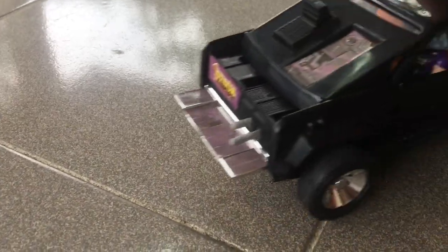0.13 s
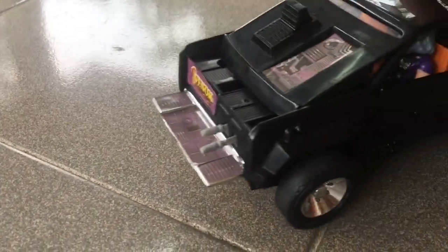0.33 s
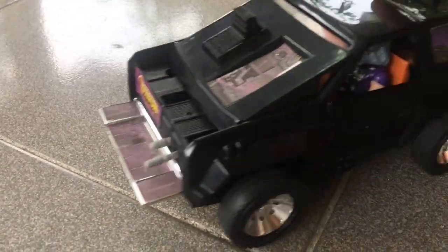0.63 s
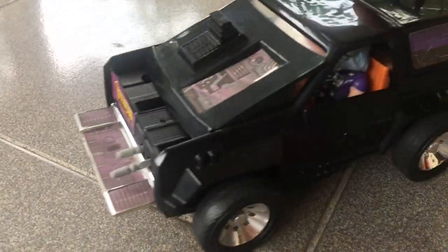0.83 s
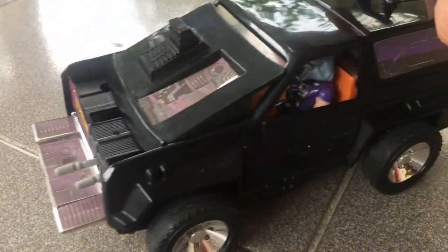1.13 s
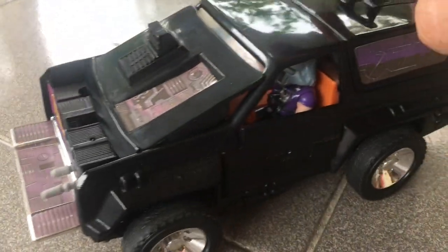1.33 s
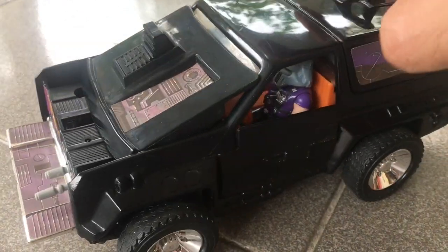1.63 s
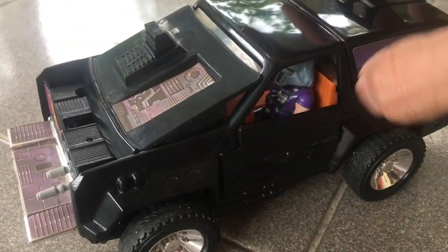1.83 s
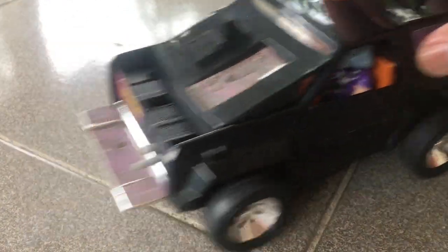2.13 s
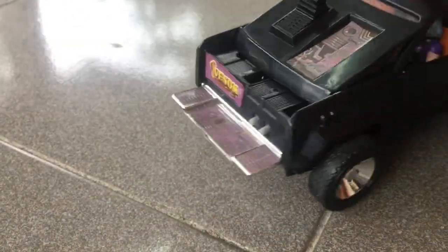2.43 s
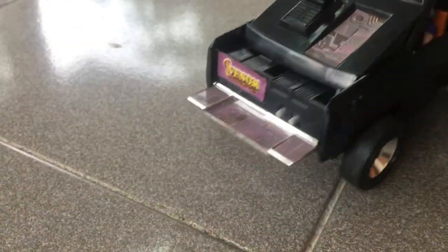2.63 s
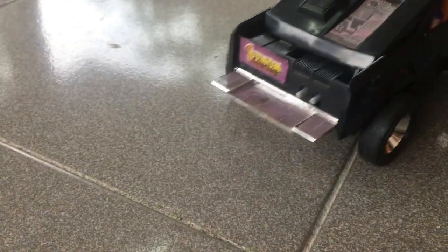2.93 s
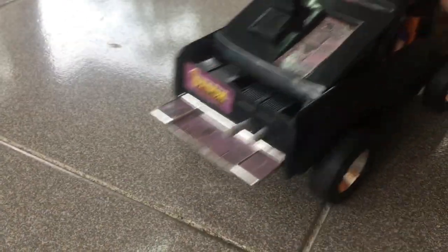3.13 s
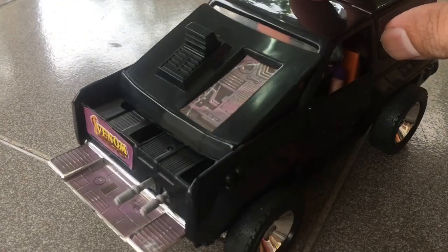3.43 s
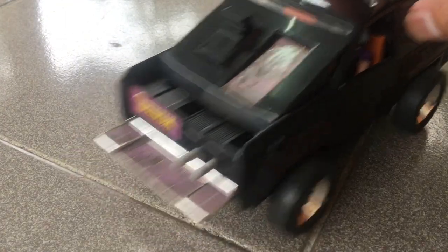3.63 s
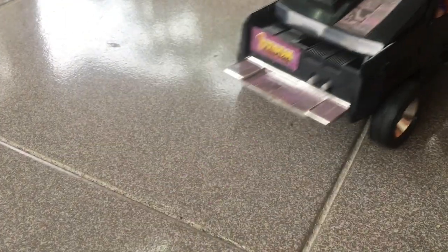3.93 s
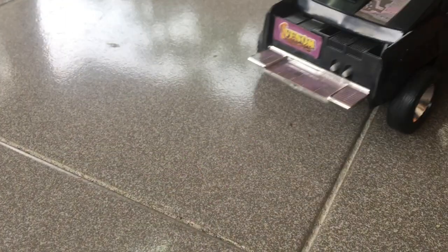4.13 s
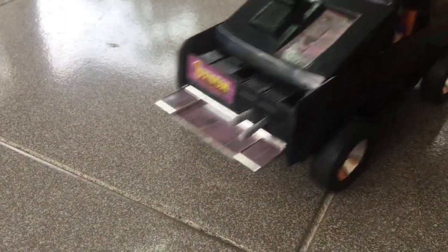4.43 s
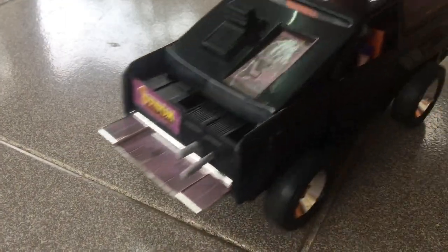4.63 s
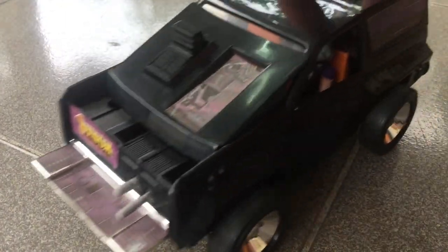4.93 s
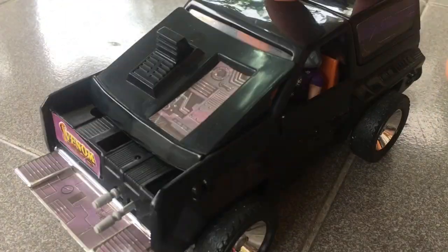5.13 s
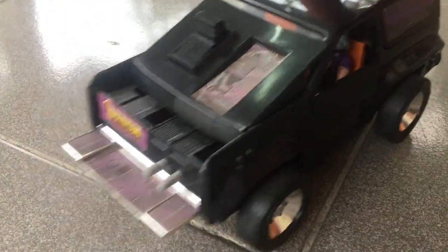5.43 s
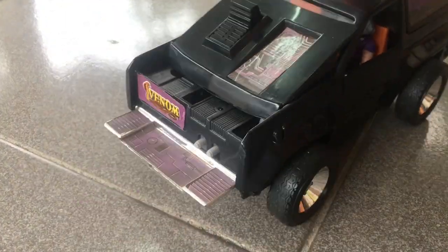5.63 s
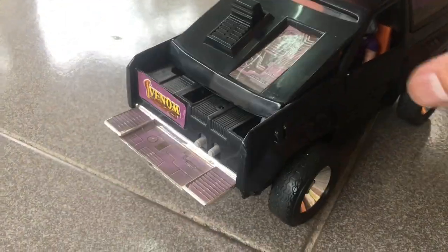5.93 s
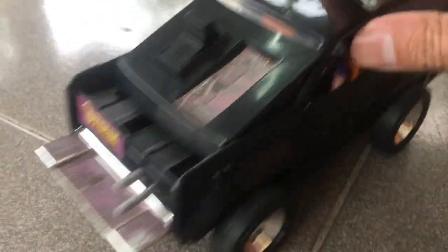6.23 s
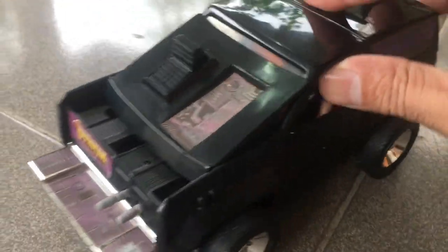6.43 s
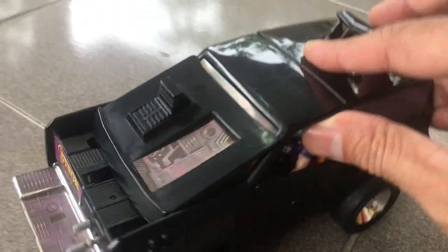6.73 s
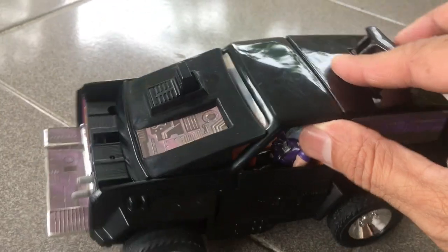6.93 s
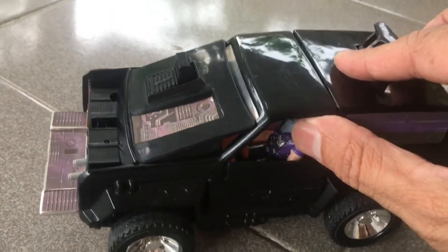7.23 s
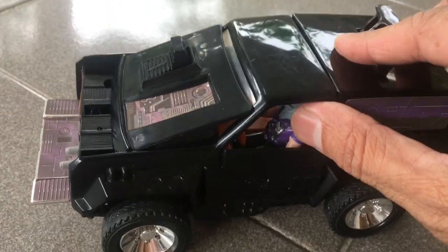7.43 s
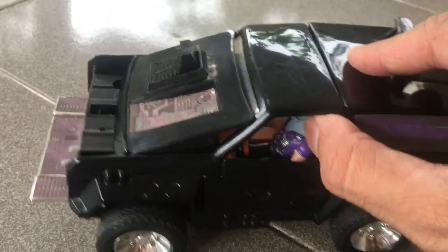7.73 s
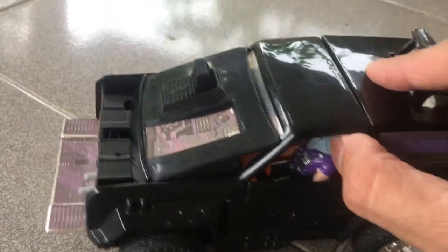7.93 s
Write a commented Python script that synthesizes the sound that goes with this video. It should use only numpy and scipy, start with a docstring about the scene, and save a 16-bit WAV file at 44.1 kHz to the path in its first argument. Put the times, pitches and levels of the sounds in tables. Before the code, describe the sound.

A hollow plastic toy truck is pushed over hard indoor tiles, very close to the microphone. From 0 to 1.4 seconds, crisp, bright clicks snap at uneven intervals of roughly 0.2 to 0.35 seconds. A deep soft rumble swells around 1.6 to 2.3. From 2.15 the clicks bunch into lighter ticks and loose rattles, with a tiny falling rubber squeak near 2.8. Strong snaps hit at 3.3 and 3.4, then small muffled clatter runs to 4.4. Four sharp clicks follow between 4.55 and 5.0, another group around 5.6, and single hard snaps at 6.45 and 6.8. Short rough rubber scuffs come at 6.9 to 7.3, with a faint one at 7.6; the rest is nearly still until about 8.1. Soft tread murmur, wavering low drone and steady dull room noise continue underneath, and clicks leave a short diffuse echo.

```python
"""Toy truck on tiles

A plastic toy truck is pushed back and forth on a tiled floor, close to the microphone.
Parts snap and rattle as rough forces ringing the modes of a hollow shell; the tread murmurs as shaped noise.
The rubber squeaks in falling chirps and scuffs by stick-slip pulses as the truck is turned.
Echoes and a diffuse tail answer, over a steady noise wash, a low wavering drone and an early deep rumble."""
import sys
import numpy as np
from scipy import signal
from scipy.fft import rfft, irfft
from scipy.io import wavfile
from scipy.ndimage import uniform_filter1d

SR = 44100
rng = np.random.default_rng(int(sys.argv[2]) if len(sys.argv) > 2 else 0)


def pcm_store(signal):
    """Save signal as 16-bit PCM."""
    levels = np.round(np.clip(np.atleast_2d(signal), -1, 1) * 32767)
    wavfile.write(sys.argv[1], SR, levels.astype(np.int16).T)


N = 356901
TIME = np.arange(N) / SR


def amp(db):
    """Decibels to gain."""
    return 10 ** (np.asarray(db) / 20)


def evened(x):
    """Scales to rms 1."""
    return x / np.sqrt(np.mean(x ** 2) + 1e-20)


def read(points, hz):
    """Reads a spectrum on a log-frequency axis."""
    f, value = np.transpose(points)
    return np.interp(np.log(hz + 1), np.log(f), value)


def curve(rows, at=TIME):
    """Reads a two-column control curve by straight lines."""
    x, y = np.transpose(rows)
    return np.interp(at, x, y)


def add(mix, s, sound):
    """Mixes a sound in at time s, trimmed to fit."""
    at = round(s * SR)
    sound = sound[max(-at, 0):]
    part = mix[max(at, 0):][:len(sound)]
    part += sound[:len(part)]


def cut(x, start_s, end_s):
    """The stretch of x between two times."""
    return x[round(start_s * SR):round(end_s * SR)]


def band(x, lo_hz, hi_hz, order=3):
    """Band-pass."""
    return signal.sosfilt(signal.butter(order, [lo_hz, hi_hz], "band", fs=SR, output="sos"), x)


def noise(colour):
    """Noise of a given spectrum, rms 1."""
    gain = amp(read(colour, np.fft.rfftfreq(N, 1 / SR)))
    return evened(irfft(rfft(rng.standard_normal(N)) * gain, N))


def wander(rate_hz):
    """Slow chance, rms 1."""
    hz = np.fft.rfftfreq(N, 1 / SR)
    return evened(irfft(rfft(rng.standard_normal(N)) * np.exp(-(hz / rate_hz) ** 2), N))


def ring(modes, size=1200):
    """Impulse response of each damped mode, one row a mode; no mode is narrower than 150 Hz."""
    hz, width_hz, db = np.transpose(modes)[:, :, None]
    width_hz = np.maximum(width_hz, 150)
    t = np.arange(size) / SR
    return amp(db) * width_hz * np.exp(-np.pi * width_hz * t) * np.cos(2 * np.pi * hz * t)


def catches(size, spread_db):
    """Tiny catches of two surfaces: mostly small, a few large."""
    return rng.standard_normal(size) * amp(spread_db * np.clip(rng.standard_normal(size), -2, 2))


def hum(hz, db, waver_db, drift_hz):
    """A low tone whose pitch drifts and whose level wavers."""
    phase = 2 * np.pi * np.cumsum(hz + drift_hz * wander(4.04)) / SR
    return amp(db + waver_db * wander(17.0)) * np.sqrt(2) * np.sin(phase)


def background(swell_db=.5, throb_db=-45):
    """A steady wash with faint hums, a low drone, and a throbbing narrow band of rumble."""
    # Spectrum of the wash. Each row: frequency in Hz, relative density in dB per Hz.
    wash_colour = [(15, -15), (26, 6), (36, -14.5), (55, -0.5), (100, 0), (150, 1), (250, -3.5), (400, -10),
                   (650, -12.5), (1000, -21), (2000, -28.5), (4000, -37), (8000, -44), (16000, -48.5)]
    # Level of the wash, its hums included. Each row: time in seconds, level in dB.
    wash_level = [(0.0, -39), (1.5, -40), (2.3, -39), (5.5, -39), (6.5, -38.3), (8.09, -38.5)]
    # Faint hums around the drone. Each row: frequency in Hz, level over the wash in dB.
    hum_rows = [(25, -13), (130, -12.5), (147.5, -8.5)]
    # Pitch of the drone before drift. Each row: time in seconds, frequency in Hz.
    drone_pitch = [(0.0, 67.5), (0.6, 71), (1.5, 65.5), (1.75, 71.5), (3.1, 71.5), (3.4, 74.5), (4.2, 74),
                   (4.6, 76), (5.5, 76), (6.0, 75), (7.15, 76), (7.45, 70.5), (8.09, 71.5)]
    # Level of the drone before waver. Each row: time in seconds, level in dB.
    drone_level = [(0.0, -35.5), (0.5, -36.5), (0.6, -56), (1.0, -41.5), (1.8, -39.5), (2.6, -37),
                   (2.75, -30), (2.85, -39.5), (3.55, -29.5), (3.7, -36.5), (4.05, -36), (4.41, -38.5),
                   (4.6, -27.5), (5.1, -39), (5.18, -50), (5.27, -30.5), (5.74, -37), (5.86, -49),
                   (5.99, -35.5), (6.37, -28.5), (6.52, -42), (6.85, -35.5), (7.37, -40.5), (7.65, -32.5),
                   (8.09, -48)]
    hums = sum(hum(hz, db, waver_db=2.5, drift_hz=2.5) for hz, db in hum_rows)
    wash_gain = amp(curve(wash_level) + swell_db * wander(7.4))
    wash = wash_gain * (noise(wash_colour) + hums)
    drone = hum(curve(drone_pitch), curve(drone_level), waver_db=1.5, drift_hz=.3)
    throb = amp(throb_db) * evened(band(rng.standard_normal(N), lo_hz=57.7, hi_hz=72, order=2))
    return wash + drone + throb


def rolling(tread_db=-1, flutter_db=1.46):
    """The tread murmurs over the tiles, and a deep rumble of handling or air swells early on."""
    # Tread on the tiles. Each row: time in seconds, level in dB before tread_db is added.
    tread_level = [(0.0, -45), (2.12, -44), (2.34, -41), (2.66, -43.5), (3.0, -42.5), (3.45, -46.5),
                   (4.48, -44.5), (4.71, -48), (5.7, -44.5), (6.9, -46.5), (8.09, -45)]
    # Spectrum of the tread. Each row: frequency in Hz, relative density in dB per Hz.
    tread_colour = [(300, -11), (750, -7), (1050, 0.5), (1350, -3), (1800, -12), (2600, -22.5), (5000, -66),
                    (15000, -50)]
    # Deep rumble. Each row: time in seconds, level in dB.
    rumble_level = [(1.5, -62), (1.65, -32.5), (1.85, -45), (2.05, -31.5), (2.32, -49), (3.3, -40),
                    (3.6, -56)]
    rumble_colour = [(15, -24), (28, -14), (48, -18), (62, -16.5), (100, -36), (400, -53), (2000, -100)]
    tread_gain = amp(tread_db + curve(tread_level) + flutter_db * wander(36))
    tread = tread_gain * noise(tread_colour)
    rumble = amp(curve(rumble_level)) * noise(rumble_colour)
    return tread + rumble


def shell(force, seconds, level_db, low_db, top_db, vary_db=3, direct=0.05):
    """A force rings the hollow shell, with a chance mix of modes and a given weight of body and edge."""
    # Resonances of the plastic. Each row: frequency in Hz, width in Hz before ring's floor, level in dB.
    shell_modes = [(1170, 180, 11), (1450, 130, 10.5), (1667, 230, 13.5), (1860, 360, 4), (2530, 220, 6),
                   (3010, 110, 3), (3520, 390, 4.5), (3840, 170, 2), (4535, 280, 4), (5130, 280, -9),
                   (5630, 380, -9), (6200, 330, -3), (6990, 420, 1.5), (7770, 920, -3), (8940, 1200, 2),
                   (10250, 830, 8.5), (11200, 310, -16), (12550, 220, -19), (16000, 310, -13)]
    # A blow with little body leaves the lowest modes at rest. Each row: low body in dB, lowest Hz.
    lowest = [(-15, 1570), (-7, 1200), (10, 730)]
    # Upper limits of the low body, the middle and the bright edge, in Hz.
    upper_hz = [2200, 6000, 17000]
    modes = ring(shell_modes)
    mix = amp(vary_db * rng.uniform(-1, 1, (len(modes), 1)))
    response = (mix * modes).sum(0)
    response[0] += direct * SR / np.pi
    sound = signal.fftconvolve(force, response)
    edges_hz = [curve(lowest, low_db), *upper_hz]
    out = 0
    for lo_hz, hi_hz, db in zip(edges_hz, edges_hz[1:], (low_db, 0, top_db)):
        part = band(sound, lo_hz, hi_hz, order=4)
        out = out + amp(db) * part / np.linalg.norm(part)
    return amp(level_db) * np.sqrt(seconds * SR) * out


def snap(t, db, low_db, top_db, fade_s, hz, rise=0.51, grip=0.79, drag_db=-20, drag_s=0.0094,
         chatter_db=-24, chatter_s=0.017, emphasis_width_hz=300, emphasis_db=1,
         hard_s=0.0013, soft_db=-5, soft_hz=5500):
    """A part drags, slips over its catch in a few milliseconds and chatters to rest, one frequency emphasised."""
    before = np.exp(-(t / (rise * fade_s)) ** 2) + amp(drag_db) * np.exp(-abs(t) / drag_s)
    after = np.exp(-abs(t) / (grip * fade_s)) + amp(chatter_db) * np.exp(-abs(t) / chatter_s)
    force = np.where(t < 0, before, after) * catches(len(t), spread_db=9)
    # treble loss: half of soft_db at the slip itself, 1.5 times soft_db away from it
    hardness = amp(soft_db * (1.5 - np.exp(-(t / hard_s) ** 2)))
    soft = signal.filtfilt(*signal.butter(2, soft_hz, fs=SR), force)
    force = soft + hardness * (force - soft)
    emphasis = ring([(hz, emphasis_width_hz, emphasis_db)])[0] * 2 * np.pi / SR
    force = force + signal.fftconvolve(force, emphasis)[:len(t)]
    return shell(force, 1 / 100, db, low_db, top_db)


def clicks(rebound_s=.013, rebound_fade_s=0.0077, rebound_low_db=1, rebound_edge_db=-2):
    """Each click is a snap of force on the shell, struck again a moment later by the rebound."""
    # Snaps of plastic parts, and a few faint ticks of a scuffing wheel. Each row: time in seconds,
    # level of the middle band over 10 ms in dB, low body and bright edge in dB over the middle,
    # fade scale in seconds, frequency emphasised in the click, in Hz, rebound in dB over the click.
    click_rows = [(0.003, -28, 0, -4.5, 0.012, 1560, -25), (0.203, -25, -3, -1.5, .005, 1480, -32),
                  (0.4894, -26, -7, -2, 0.0038, 3980, -22), (0.6893, -22.5, -6, -2, 0.0049, 3960, -16.5),
                  (1.005, -25, -3, -1, 0.0077, 6940, -15), (1.3588, -26, -5, -1.5, 0.0065, 3220, -15),
                  (2.1578, -29.5, -1, -4.5, 0.0033, 1760, -18), (2.216, -37, -6, 0.5, 0.0027, 1130, -7),
                  (2.2664, -28.5, 1, -1.5, .0045, 1800, -15), (2.338, -34.5, 7, 1, .005, 1450, -2.5),
                  (2.4497, -43, 2.5, -5, 0.0018, 1120, -18), (2.4694, -44, 2, -11, 0.011, 1590, -20),
                  (2.84, -40.5, 11, -9, .004, 2540, -25), (2.8511, -35, 0, -3, .005, 2490, -7),
                  (3.0735, -42, -4, -11, 0.0054, 1820, -18), (3.148, -44.5, -1, -19, 0.0052, 2490, -10),
                  (3.198, -38.5, 2, -3.5, 0.0033, 1630, -25), (3.2059, -40.5, 7.5, -19, .005, 1590, -15),
                  (3.3138, -23, -5.5, -1, 0.0059, 7150, -20), (3.3686, -50, 14, -13, 0.007, 1600, -25),
                  (3.398, -25.5, -2, -2.5, 0.0049, 3730, -27), (3.661, -37.5, 8, -11, 0.0038, 1750, -24),
                  (3.6673, -34, 7.5, -3, 0.0017, 1160, -1), (3.774, -32.5, -5, 0.5, 0.0044, 1770, -3.5),
                  (3.801, -35.5, -15, 2, 0.006, 2620, -1), (3.8735, -36, 7.5, -6, 0.0052, 1810, -2.5),
                  (3.9508, -39.5, 6.5, -3, 0.0045, 2010, 6), (4.0473, -35, 5, -5.5, 0.013, 1520, -21),
                  (4.3325, -41.5, -11, -6, 0.0059, 1770, -20), (4.355, -46, 10.5, -14, 0.0059, 1730, -20),
                  (4.43, -43, 1, -13, .005, 1590, -20), (4.5577, -26.5, -4, -2.5, 0.0064, 3320, -9.5),
                  (4.668, -25.5, -4, 0.5, 0.0061, 3340, -11), (4.8132, -26, -3.5, -2, 0.0055, 1700, -33),
                  (5.0083, -25, -5.5, 3, .0036, 6270, -9), (5.5178, -46.5, 12, -4, 0.0062, 1090, -7),
                  (5.5714, -27.5, -4.5, -4.5, 0.0026, 3960, -25),
                  (5.6068, -39.5, 1, -12, 0.0028, 1450, -18), (5.6288, -33.5, -13, -1.5, .0045, 2520, -21),
                  (5.7065, -47.5, 0, -8, 0.005, 1160, -22), (6.0187, -47, -17, -8, .0025, 1140, -25),
                  (6.0999, -49, 8.5, -1.5, .003, 1340, 2.5), (6.2583, -42, 5.5, -2.5, 0.0022, 1260, -17),
                  (6.446, -26.5, -5, -2.5, 0.0042, 3820, -36), (6.6595, -52.5, 12.5, -2, 0.0035, 1340, -12),
                  (6.7357, -41.5, 8, -15, 0.0059, 2130, -12), (6.8025, -21, -9.5, 2, 0.0025, 4020, -34),
                  (7.1756, -49.5, 5, -7, .0045, 1340, -25), (7.2587, -51, 4, -2, .0025, 1300, -3),
                  (7.279, -52, 5, -1, .0025, 1300, -25), (7.9957, -45, -16, -9, .0036, 1300, -25)]
    out = np.zeros(N)
    t = np.arange(-.02, .05, 1 / SR)
    for s, db, low_db, top_db, fade_s, hz, rebound_db in click_rows:
        first = snap(t, db, low_db, top_db, fade_s, hz)
        add(out, s + t[0], first)
        second = snap(t, db + rebound_db, rebound_low_db, top_db + rebound_edge_db, rebound_fade_s, hz)
        add(out, s + t[0] + rebound_s, second)
    return out


def after_ring(x):
    """A few stiff, lightly damped parts keep ringing faintly after each click."""
    # Modes of these parts. Each row: frequency in Hz, t60 in seconds, gain at resonance in dB.
    stiff_modes = [(2990, .3, -7), (4520, .25, -7), (5090, 0.4, 0)]
    t = np.arange(SR // 2) / SR
    tail = 0
    for hz, t60_s, db in stiff_modes:
        rate = np.log(1000) / t60_s
        tail = tail + amp(db) * 2 * rate / SR * np.exp(-rate * t) * np.sin(2 * np.pi * hz * t)
    return signal.fftconvolve(x, tail)[:N]


def ticks(per_s=7, level_db=-71, spread_db=1.0, fade_s=0.0023, low_db=4, top_db=-8):
    """Faint stray ticks of the axles and trim: fading noise bursts at random moments ring the shell."""
    blows = (rng.random(N) < per_s / SR) * amp(spread_db * np.clip(rng.standard_normal(N), -2, 2))
    fading = signal.lfilter([1], [1, -np.exp(-1 / (fade_s * SR))], blows)
    force = fading * rng.standard_normal(N)
    return shell(force, N / SR, level_db, low_db, top_db)[:N]


def rattles():
    """Loose parts rattle, and a few faint single clicks sound as short bursts; uneven noise rings the shell."""
    # Rattles and short bursts. Each row: start in seconds, end in seconds, level of the middle band in dB,
    # low body and bright edge in dB over the middle.
    rattle_rows = [(1.33, 1.337, -49, 2, -7), (1.352, 1.363, -40, 8, -4), (2.33, 2.364, -42.5, -7, 3),
                   (2.371, 2.401, -55, 2, 5), (2.557, 2.71, -61, 5.5, -9), (2.803, 2.89, -55, 10, -14),
                   (2.882, 3.01, -71, 7, -22), (3.07, 3.128, -52, 8.5, -8), (3.23, 3.295, -55, 8, -1),
                   (3.642, 3.687, -46.5, 11.5, -4), (3.735, 3.833, -42.5, 6, -15),
                   (4.32, 4.372, -55, 5, -9), (4.42, 4.451, -50, 6, -6), (4.477, 4.521, -50.5, 0, 0),
                   (4.98, 5.022, -46.5, 4.5, -15), (5.60, 5.643, -49, 10.5, -9),
                   (6.238, 6.258, -46.5, 5, -8), (6.272, 6.328, -54, 8, -7), (6.321, 6.372, -52, 4, -1),
                   (6.572, 6.596, -57.5, 13, -12), (6.615, 6.727, -55.5, 4, -12),
                   (6.763, 6.838, -54.5, 10.5, -15), (7.867, 7.91, -54, 0, -11)]
    out = np.zeros(N)
    force = catches(N, spread_db=9.0) * amp(4.7 * wander(170))
    for start, end, db, low_db, top_db in rattle_rows:
        part = cut(force, start, end)
        shaped = part * signal.windows.tukey(len(part), .3)
        add(out, start, shell(shaped, len(part) / SR, db, low_db, top_db))
    return out


def squeaks(jitter=0.053, flutter_db=4, sag_hz_per_s=3900):
    """A squeal of rubber in short, rough chirps, the pitch falling as the rubber lets go."""
    # Chirps of a tyre. Each row: start in seconds, length in seconds, starting pitch in Hz, level in dB.
    squeak_rows = [(2.768, 0.026, 3000, -47), (2.782, 0.055, 2500, -40), (2.819, .012, 1850, -42),
                   (2.908, .06, 2270, -51)]
    out = np.zeros(N)
    waver, flutter = 1 + jitter * wander(900), amp(flutter_db * wander(400))
    for start, length, hz, db in squeak_rows:
        now = (TIME >= start) & (TIME < start + length)
        pitch_hz = (hz - sag_hz_per_s * (TIME[now] - start)) * waver[now]
        chirp = evened(np.sin(2 * np.pi * np.cumsum(pitch_hz) / SR) * flutter[now])
        add(out, start, amp(db) * chirp * signal.windows.tukey(len(chirp), .4))
    return out


def scuffs(slips_hz=380, unevenness=0.32, grit=0.071, rough_db=3.0, judder_hz=105, judder_db=3):
    """Rubber sticks and slips on the glaze while the wheel judders; every slip rings the wheel."""
    # Tyres dragged sideways. Each row: start in seconds, end in seconds, level in dB before the band-pass.
    scuff_rows = [(6.858, 6.929, -35), (6.977, 7.022, -32.5), (7.005, 7.083, -45.5), (7.132, 7.15, -46),
                  (7.257, 7.288, -42), (7.597, 7.661, -43.5)]
    # Resonances of a scuffing tyre. Each row: frequency in Hz, width in Hz, level in dB.
    tyre_modes = [(1089, 160, -7), (1285, 200, 28.5), (2400, 470, -34), (3860, 250, 9.5), (5990, 800, -19),
                  (8650, 1600, -9), (13000, 1800, -31)]
    turns = np.cumsum(slips_hz * np.exp(unevenness * wander(300))) / SR
    slips = np.diff(np.floor(turns), prepend=0) + grit * rng.standard_normal(N)
    judder = np.cos(2 * np.pi * np.cumsum(judder_hz * np.exp(.2 * wander(37.6))) / SR)
    force = slips * amp(rough_db * wander(121) + judder_db * judder)
    modes = ring(tyre_modes)
    wheel = modes[::2].sum(0) - modes[1::2].sum(0)  # neighbouring modes push the air in opposite senses
    sound = signal.fftconvolve(force, wheel)[:N]
    out = np.zeros(N)
    for start, end, db in scuff_rows:
        part = cut(sound, start, end)
        add(out, start, amp(db) * evened(part) * signal.windows.tukey(len(part), .25))
    return band(out, 570, 15000, order=2)


def reflections(x, early_db=-15, early_s=0.0039, per_s=1500):
    """Quick echoes from the floor and things nearby: sparse random taps that die away."""
    t = np.arange(SR // 10) / SR
    taps = rng.standard_normal(len(t)) * (rng.random(len(t)) < per_s / SR)
    taps = taps * np.exp(-t / early_s) * (t > .004)
    return amp(early_db) * signal.fftconvolve(x, taps / np.linalg.norm(taps))[:N]


def room(x, build_s=0.0014, size=512):
    """A diffuse tail: the power in each band spreads out in time and dies, the lower bands first."""
    # Reverberation. Each row: frequency in Hz, t60 in seconds, level of the tail in dB.
    walls = np.array([(940, 0.28, -10.5), (2470, 0.36, -14.5), (3700, 0.53, -18.5), (5030, 0.59, -17.5),
                      (8900, .5, -21), (15000, 0.63, -23)])
    hz, t, z = signal.stft(x, SR, nperseg=size)
    power = uniform_filter1d(abs(z) ** 2, size=9, axis=0)  # heard from all sides, the resonances even out
    t = t[t < 1]
    t60_s = read(walls[:, :2], hz)[:, None]
    tail_db = read(walls[:, ::2], hz)[:, None]
    decay = amp(-60 * t / t60_s) ** 2 * (1 - np.exp(-t / build_s)) ** 2
    decay = decay / decay.sum(1, keepdims=True)
    power = signal.fftconvolve(power, decay, axes=1)[:, :z.shape[1]]
    hiss = signal.stft(rng.standard_normal(N), SR, nperseg=size)[2]
    tail = hiss / hiss.std() * np.sqrt(abs(power)) * amp(tail_db)
    return signal.istft(tail, SR, nperseg=size)[1][:N]


def scene():
    """The truck in its room, over the rolling and the background."""
    snaps = clicks()
    truck = snaps + after_ring(snaps) + rattles() + ticks() + scuffs() + squeaks()
    return (truck + reflections(truck) + room(truck) + rolling() + background())[None]


def record(dry, edge_hz=15800):
    """The colour of the microphone port, then the band limit."""
    # Dips of the port. Each row: frequency in Hz, width in Hz, gain in dB.
    port_dips = [(4820, 450, -5), (7740, 420, -3), (10480, 480, -9)]
    hz = np.fft.rfftfreq(N, 1 / SR)
    port_db = sum(db * np.exp(-((hz - centre) / width) ** 2) for centre, width, db in port_dips)
    heard = irfft(rfft(dry) * amp(port_db), N)
    low_pass = signal.firwin(255, edge_hz, window=("kaiser", 8), fs=SR)
    return signal.oaconvolve(heard, low_pass[None], "same")


dry = scene()
out = record(dry)
pcm_store(out)
```